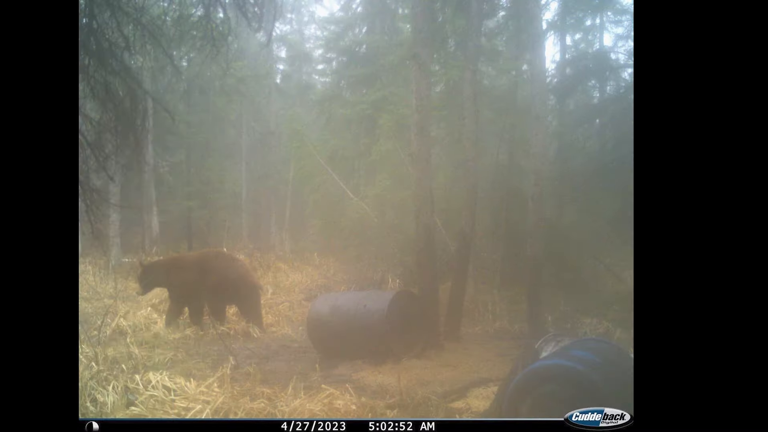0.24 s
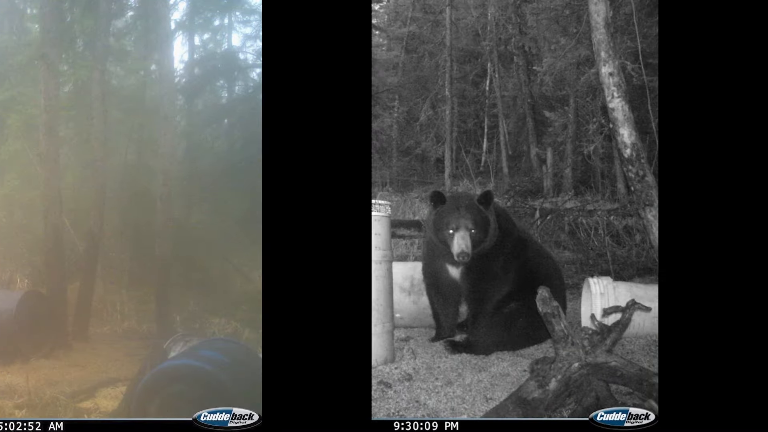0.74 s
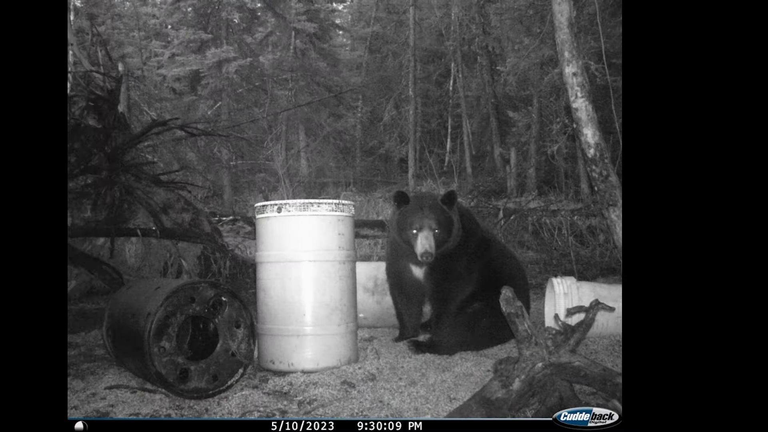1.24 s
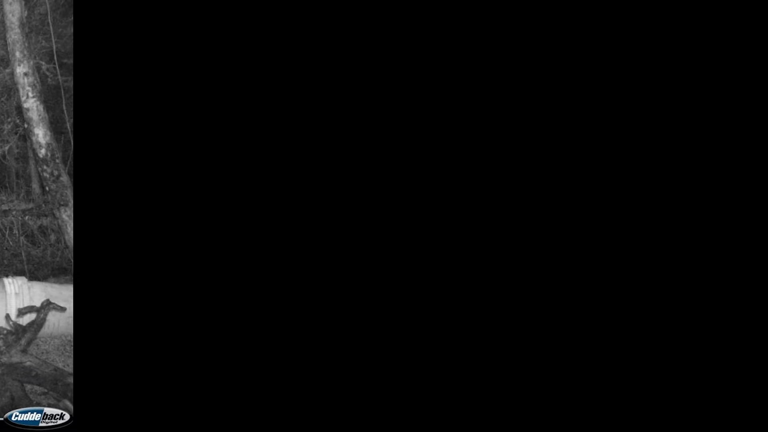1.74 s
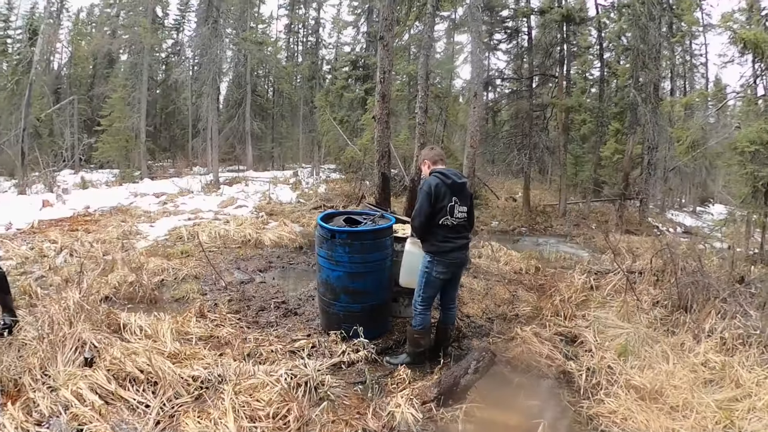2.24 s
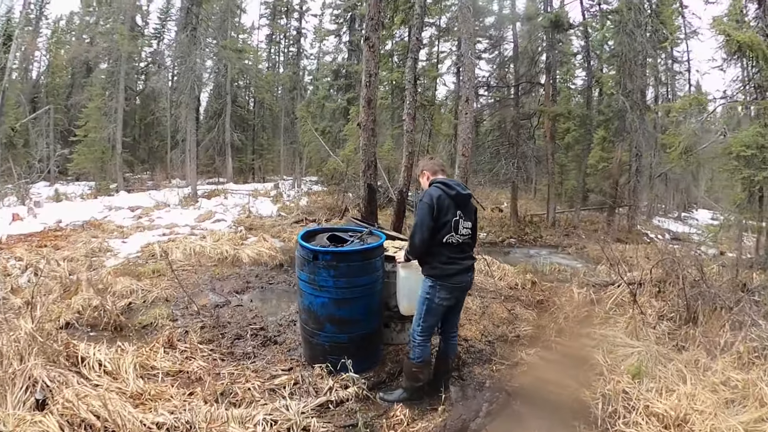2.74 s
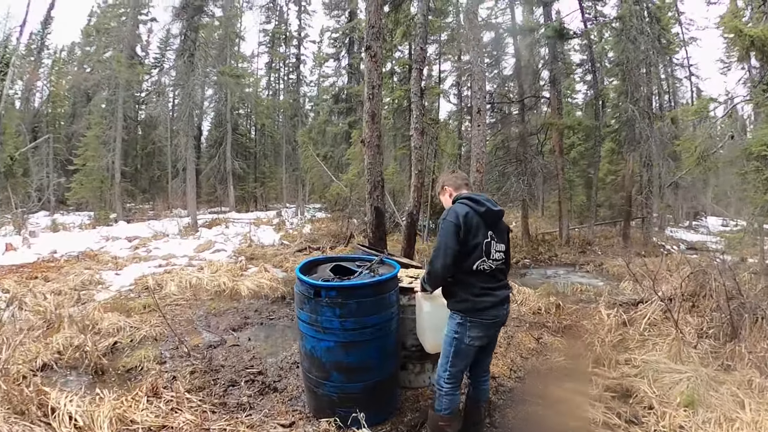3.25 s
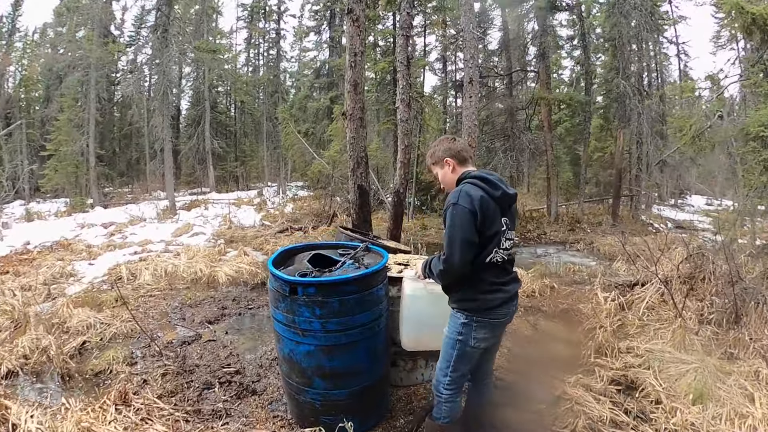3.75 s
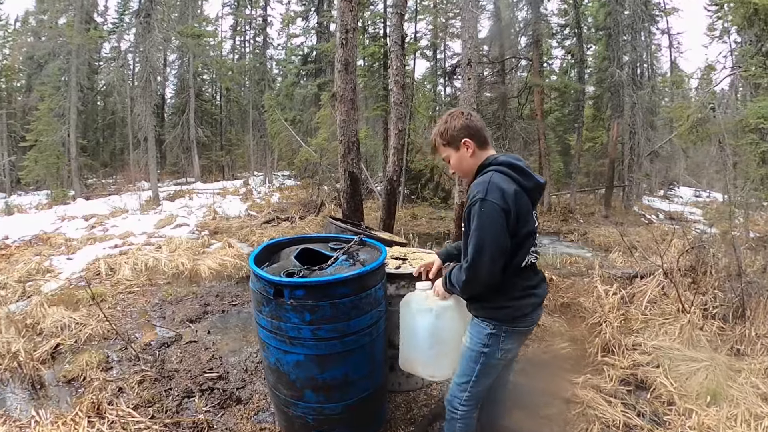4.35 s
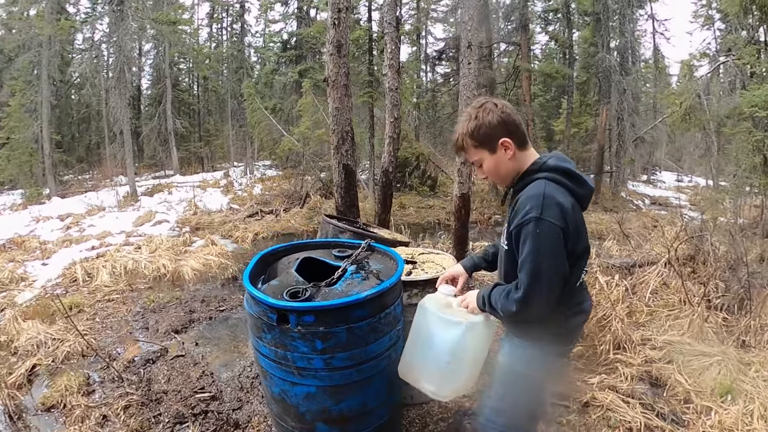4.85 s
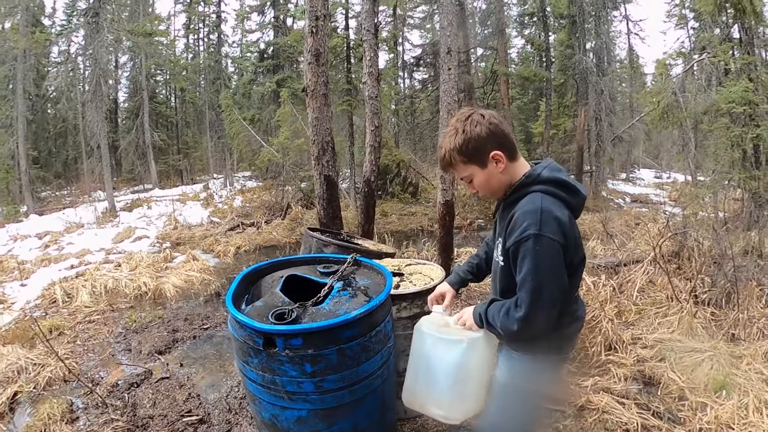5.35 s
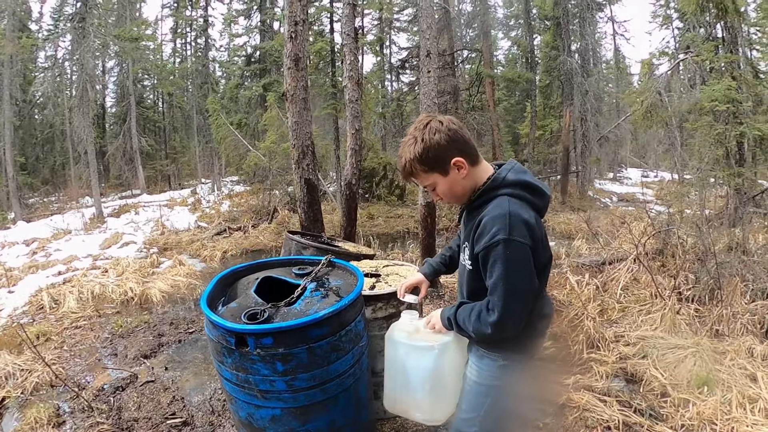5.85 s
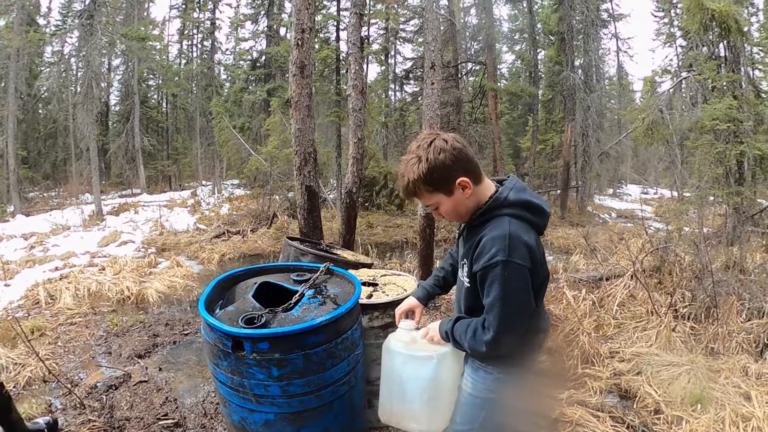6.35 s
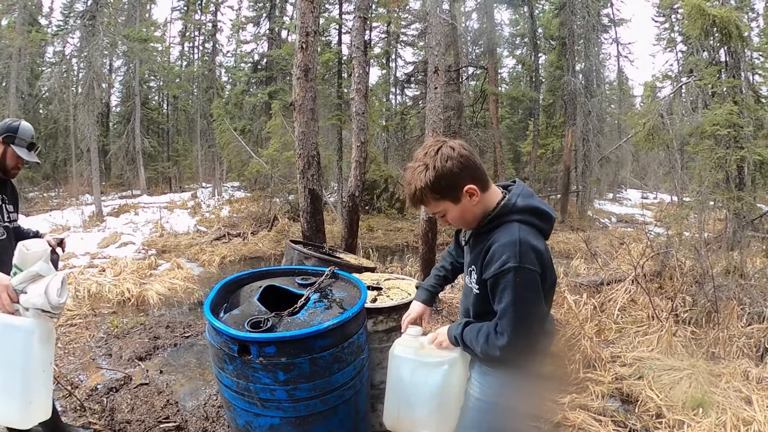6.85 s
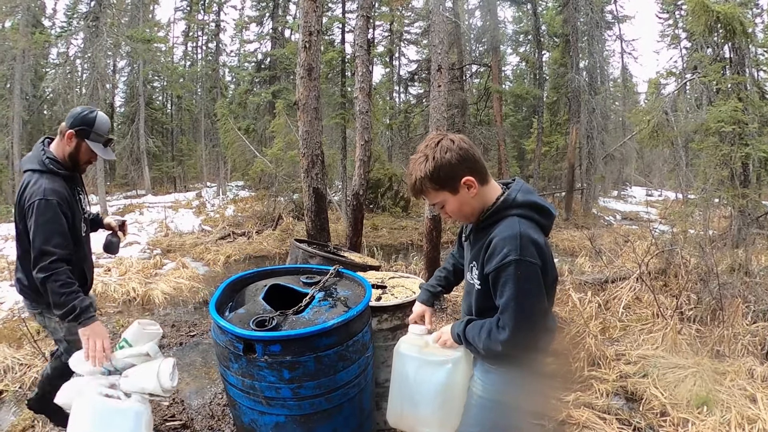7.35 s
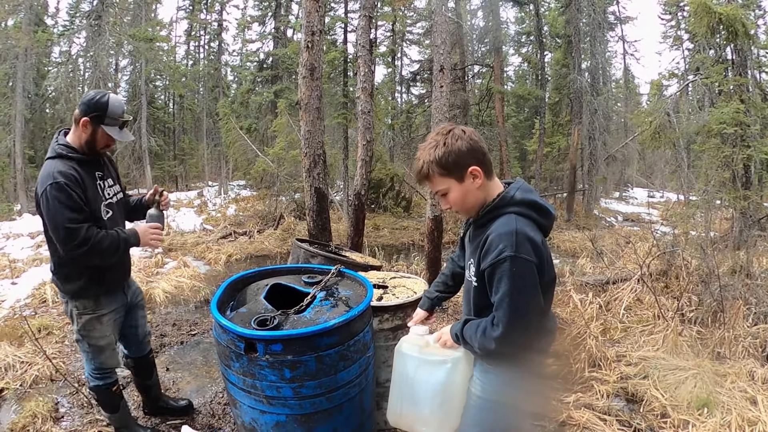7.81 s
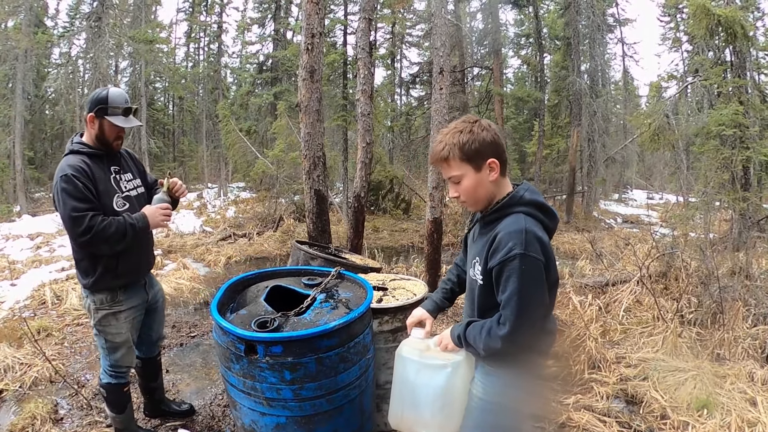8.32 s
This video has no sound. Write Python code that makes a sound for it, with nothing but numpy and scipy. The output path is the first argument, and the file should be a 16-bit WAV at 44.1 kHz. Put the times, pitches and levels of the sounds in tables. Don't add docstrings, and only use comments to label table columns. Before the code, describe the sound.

Over a faint low wind, two sharp clicks snap in near quiet. Boots brush through dry grass and suck out of wet mud with popping bubbles, squelches and twig snaps. Then a full plastic jug thuds, sloshes and glugs between rustling drags, ending in a cluster of heavy hollow knocks and a soft fade. Close stereo microphone outdoors, dry, with no echo.

```python
import sys
import numpy as np
from scipy import signal
from scipy.io import wavfile
from scipy.ndimage import uniform_filter1d

SR = 44100
rng = np.random.default_rng(int(sys.argv[2]) if len(sys.argv) > 2 else 0)


def generate_wav(signal):
    frames = np.transpose(np.atleast_2d(signal))
    scaled = np.clip(frames, -1, 1) * 32767
    pcm = np.round(scaled).astype(np.int16)
    wavfile.write(sys.argv[1], SR, pcm)


def ratio_of_db(decibels):
    return 10 ** (np.asarray(decibels, float) / 20)


N = 378378

# (pitch [Hz], density [dB per Hz])
AIR_SPECTRUM = [(100, 5.5), (237, -4), (333, -3.5), (449, -13.5), (924, -20), (2060, -13), (2470, -24),
                (12000, -48)]
# (time [s], level [dB])
AIR_SWELL = [(0, 5.5), (.3, 8.5), (.5, 1), (1, 2.5), (1.5, 7.5), (8.58, 14)]
# (time [s], peak [dB])
BUMPS = [
    (0.191, -55.5),
    (1.67, -65),
    (2.27, -53),
    (4.9, -28),
    (8.31, -58),
]
# (time [s], peak [dB])
TICKS = [
    (0.209, -49.5),
    (0.344, -48),
    (0.3815, -9.5),
    (0.9922, -49),
    (1.3826, -9.5),
]
# (pitch [Hz], level [dB], t60 [s])
CAP_MODES = [(602, -18, 0.018), (1170, -16.5, 0.009), (3080, 0.5, 0.0043), (4470, 2, 0.0038),
             (6000, -0.5, 0.003), (7540, -2, 0.002), (10030, -6, 0.0011)]
# (time [s], peak [dB], pitch
# [Hz], t60 [s])
POPS = [(0.3825, -48, 577, 0.045), (0.406, -24, 1000, 0.011), (0.9933, -30, 970, 0.013),
        (1.3769, -31, 1000, 0.013), (2.526, -19, 520, 0.028), (2.601, -16.5, 1250, 0.052),
        (2.72, -9.5, 1720, 0.045), (2.637, -19, 563, 0.14), (2.688, -16, 620, 0.05),
        (2.722, -14, 320, 0.089), (2.792, -23.5, 1140, 0.025), (3.22, -21, 1700, 0.063),
        (3.277, -14, 1620, 0.025), (3.335, -15, 1480, 0.025), (3.357, -9.5, 1890, 0.066),
        (3.379, -10, 1630, 0.015), (3.384, -15, 1370, 0.043), (3.468, -18.5, 479, 0.076),
        (3.551, -12.5, 1990, 0.078), (3.649, -14, 377, 0.03), (4.401, -11, 1220, 0.044),
        (4.514, -18.5, 1520, 0.077),
        (5.548, -29, 850, 0.06), (5.652, -19, 1220, 0.03), (5.731, -25.5, 790, 0.069),
         (6.243, -18.5, 1900, 0.018), (6.347, -20, 1373, 0.14), (6.985, -21, 630, 0.034),
         (7.041, -13, 1700, 0.014), (7.124, -16.5, 2210, 0.02), (7.391, -20.5, 400, 0.036),
         (7.483, -23, 397, 0.045), (7.604, -25, 920, 0.14), (7.675, -13, 342, 0.05)]
# (time [s], peak [dB], pitch [Hz], t60 [s])
PLOPS = [
    (2.965, -27.5, 2210, 0.07),
    (3.953, -23, 1812, 0.096),
    (4.531, -27, 456, 0.053),
    (4.576, -29.5, 330, 0.025),
]
# (peak time [s], fine hiss [dB], coarse stalks [dB], swell [s], fade [s])
STROKES = [(.848, -66.5, -67, 0.03, 0.031), (1.12, -77.5, -71, 0.2, 0.39), (1.45, -68.5, -63, 0.42, 0.71),
           (1.67, -48.5, -57, 0.16, 0.39), (1.876, -41, -46, 0.31, 0.68), (2.174, -41.5, -48, 0.88, 0.22),
           (2.552, -32.5, -34, 0.32, 0.088), (2.6, -43.5, -41.5, .06, 0.58), (3.03, -44, -46.5, 0.066, .02),
           (3.05, -52.5, -56.5, 0.016, 0.94), (3.215, -39, -35.5, 0.0072, 0.42),
           (3.485, -45, -40, 0.14, 0.095), (3.555, -40, -39, 0.018, 0.068), (3.679, -45.5, -38, 0.1, 0.2),
           (3.85, -53.5, -47, 0.25, 1), (4.216, -43, -48, 0.0071, 0.062), (4.29, -34, -37, 0.12, 0.44),
           (4.479, -37, -35.5, 0.15, 0.14),
           (4.72, -58, -57, 0.65, 0.27), (4.88, -50.5, -44.5, 0.054, 0.18), (5.0, -43.5, -38.5, 0.043, 0.41),
         (5.172, -38.5, -36, 0.27, 0.5), (5.362, -39, -34.5, 0.11, 0.34), (5.754, -43.5, -39, 0.95, 0.91),
         (6.1, -49.5, -44.5, 0.12, 1), (6.355, -44, -33.5, 0.024, 0.21), (6.68, -35, -32.5, 0.57, 0.21),
         (6.8, -44.5, -43, 0.12, 0.62), (7.165, -51, -40, 0.28, 0.21), (7.45, -53, -43, 0.39, 0.15),
         (7.633, -32, -33.5, 0.045, 0.036), (7.76, -53.5, -50, 0.31, 0.04),
         (7.798, -45.5, -38.5, 0.027, 0.2), (8.03, -56.5, -50, 0.15, 0.29), (8.43, -67, -57.5, 0.34, 0.23)]
# (pitch [Hz], density [dB per Hz])
HISS_SPECTRUM = [(2650, -34), (4500, -3), (5480, -5), (6150, 17.5), (7770, 16.5), (10900, 3), (12900, -7.5),
                 (15000, -44)]
# (time [s], left over right [dB])
SIDE_DB = [(1.5, -4), (1.68, 5.5), (3.43, 2), (3.84, 0), (4.2, 6), (8.18, 7.5), (8.58, 2)]
# (time [s], wash [dB])
WASH = [(1.55, 10), (1.9, 9), (2.3, 2), (2.4, -8), (4.7, -7), (5.0, 1), (6.9, 12), (7.0, -1), (8.1, -1)]
# (peak time [s], small bubbles [dB], big bubbles
# [dB], swell [s], fade [s])
SLOSHES = [(1.834, -47.5, -54, 0.22, 0.5), (2.142, -48.5, -60, 0.28, 0.34), (2.4, -42, -40, 0.091, 0.08),
           (2.5, -32, -39.5, 0.12, 0.52), (2.65, -30, -37, 0.19, 0.27), (2.803, -46, -49.5, 0.074, 0.58),
           (3.15, -44, -39.5, 0.02, 0.048), (3.266, -31, -39, 0.074, 0.43), (3.436, -37, -36.5, 0.36, 0.56),
           (3.96, -41.5, -48, 0.69, 0.28), (4.36, -40.5, -46.5, 0.32, 0.062),
           (4.412, -21, -33.5, 0.019, 0.032), (4.526, -41, -47, 0.55, 0.21),
           (4.838, -42, -34.5, 0.0046, 0.085), (4.9, -45.5, -46, 0.065, 0.33),
          (5.035, -39.5, -44, 0.046, 0.39), (5.343, -39, -55, 0.11, 0.7), (5.73, -42, -41.5, 0.3, 0.19),
          (5.98, -50, -55, 0.27, 1), (6.159, -38, -34, 0.004, 0.075), (6.397, -34, -43.5, 0.13, 0.11),
          (6.67, -33.5, -39.5, 0.54, 0.13), (6.8, -49.5, -63, 0.085, 0.55),
          (6.983, -37.5, -34, 0.0033, 0.061), (7.041, -37.5, -31.5, 0.0042, 0.18),
          (7.127, -37, -42, .004, 0.39), (7.392, -37.5, -35, 0.006, 0.13), (7.484, -34, -28, 0.0094, 0.071),
          (7.641, -36, -26, 0.038, 0.078), (7.675, -39.5, -25.5, 0.029, 0.15),
          (7.8, -38, -35.5, 0.025, 0.14), (7.97, -50.5, -70, 0.87, 0.45)]
# (peak time [s], level [dB], swell [s], fade [s])
LOADS = [(2.412, -40, 0.29, 0.28), (2.562, -18, 0.071, 0.017), (2.722, -27.5, 0.26, 0.11),
         (3.0, -48, 0.17, 0.4), (3.192, -29, 0.081, 0.87), (3.713, -27, 0.068, 0.0088),
         (4.079, -35, 0.097, 0.22), (4.317, -38.5, 0.12, 0.35), (4.84, -18, 0.0042, 0.031),
         (4.875, -21, 0.035, 0.2), (5.137, -30, 0.63, 0.075), (5.3, -40.5, 0.094, 0.23),
         (5.42, -27.5, 0.017, 0.16), (5.54, -28.5, 0.054, 0.32), (5.746, -24, 0.12, 0.13),
         (5.84, -40.5, .05, .12), (6.165, -30, 0.008, 0.45), (6.69, -31, 0.4, .06),
         (6.985, -26, 0.0077, 0.47), (7.045, -31, 0.011, 1), (7.396, -23, 0.0039, 0.19),
         (7.49, -19.5, 0.012, .11), (7.645, -15, 0.046, 0.42), (7.74, -12.5, 0.19, 0.16),
         (7.85, -11, 0.049, 0.024), (7.89, -28.5, 0.02, 0.18), (8.294, -44, 0.14, 0.17)]
# (pitch [Hz], width [Hz], level [dB])
JUG_MODES = [(140, 30, -5), (198, 16, 3), (260, 32, 0), (330, 80, -10)]
# (time [s], peak [dB], centre [Hz])
SNAPS = [(2.3257, -31, 7740), (2.4695, -24, 8600), (3.144, -40.5, 7840), (3.2091, -22, 7550),
         (3.251, -20, 8040), (3.3023, -19.5, 6000), (3.355, -22.5, 6600), (3.365, -24.5, 4540),
         (3.4761, -28.5, 5900), (3.662, -29, 2900), (5.6538, -23.5, 3200), (5.7318, -24, 2350),
         (6.0017, -33, 3950), (6.3485, -33, 3860), (7.1245, -28.5, 2470), (7.605, -34, 7560),
         (7.632, -26.5, 3320), (7.796, -25, 2460), (8.153, -38.5, 3150), (8.2, -36.5, 7150)]
# (time [s], peak [dB], centre [Hz])
STALKS = [(3.8144, -37, 3100), (3.899, -31.5, 5350), (4.0886, -32, 6680), (4.1674, -31, 4900),
          (4.2163, -33.5, 3500), (4.262, -32, 7200), (4.5415, -22.5, 5900), (4.603, -31, 7500),
          (4.7294, -43, 7830), (4.8354, -31, 3700), (4.857, -30, 4010), (4.913, -41, 3610),
          (4.9457, -40, 3680), (4.994, -29, 6070), (5.328, -24, 6310), (5.3577, -21, 6210),
          (5.913, -22, 6000), (5.9728, -36, 4320), (6.4911, -29, 4030), (7.0397, -41, 3520),
          (7.15, -27, 4530), (7.2529, -35, 4200), (7.307, -39, 3120), (7.398, -23, 3770),
          (7.4814, -24.5, 3040), (7.495, -28, 3420), (7.8542, -24, 3200), (7.9332, -32, 4110),
          (8.077, -39, 3500), (8.108, -34, 3100)]
# (time [s], peak [dB], centre [Hz], length
# [s])
SQUELCHES = [(2.349, -29.5, 2070, 0.012), (2.369, -23, 1450, 0.005), (2.397, -19.5, 1300, 0.011),
             (2.423, -22, 2220, 0.01), (2.466, -15.5, 1910, 0.018), (2.478, -19, 2940, 0.012),
             (2.503, -26, 1170, 0.005), (2.552, -12, 2990, 0.01), (2.616, -17, 1740, 0.027),
             (2.663, -12, 543, 0.0093), (2.733, -18, 1380, 0.016), (2.748, -20.5, 2100, 0.012),
             (2.808, -29, 650, 0.006), (2.831, -25.5, 730, 0.01), (2.869, -30, 1330, 0.012),
             (2.951, -32, 1680, 0.017), (3.144, -33, 1150, 0.013), (3.258, -16, 1700, 0.018),
             (3.3, -14, 1900, 0.006), (3.307, -16, 2700, 0.017), (3.401, -18, 1900, 0.012),
             (3.425, -19, 905, 0.017), (3.438, -14, 1830, 0.024), (3.472, -14.5, 1070, 0.022),
             (3.529, -16, 1290, 0.023), (3.596, -26, 1000, 0.008), (3.623, -30, 1200, 0.011),
             (3.658, -19.5, 1000, 0.015), (3.692, -20.5, 1180, 0.033), (3.75, -23.5, 1140, 0.0088),
             (3.776, -20.5, 520, 0.0078), (3.815, -30.5, 1790, 0.0092), (3.868, -32, 1520, 0.012),
             (3.895, -22.5, 1030, 0.0093), (3.947, -24.5, 627, 0.013), (3.968, -26.5, 1180, 0.0072),
             (4.279, -29, 2150, 0.01), (4.309, -27, 1390, 0.017), (4.374, -25, 2330, 0.019),
             (4.412, -10.5, 1500, 0.011), (4.629, -31.5, 2040, 0.02),
             (4.794, -29.5, 1530, 0.013), (4.821, -26.5, 1450, 0.006), (4.837, -19.5, 810, 0.0083),
            (4.85, -26, 950, 0.0095), (4.961, -31, 1120, 0.013), (5.021, -38, 2800, 0.01),
            (5.328, -30, 2700, 0.0099), (5.54, -24, 1560, 0.013), (5.607, -26.5, 1170, 0.012),
            (5.656, -22, 1400, 0.0093), (5.702, -34, 1890, 0.012), (5.913, -27.5, 1830, 0.0081),
            (5.975, -39, 2090, 0.0099), (5.99, -27, 2120, 0.01), (6.072, -34, 910, 0.008),
            (6.16, -26, 1110, 0.01), (6.366, -18, 1380, 0.015), (6.595, -29, 1050, 0.012),
            (6.627, -20, 1450, 0.012), (6.663, -19, 1680, 0.012), (7.044, -12.5, 1380, 0.01),
            (7.103, -30, 1190, 0.013), (7.125, -20, 1390, 0.0079), (7.14, -28, 1330, 0.011),
            (7.225, -20, 1270, 0.012), (7.237, -21, 1380, 0.0074), (7.293, -19, 1880, 0.012),
            (7.303, -23, 2210, 0.012), (7.393, -24, 970, 0.0099), (7.486, -14, 783, 0.0099),
            (7.614, -18.5, 1490, 0.021), (7.634, -17, 1690, 0.0092), (7.658, -19.5, 1010, 0.02),
            (7.804, -15.5, 2370, 0.0079), (7.887, -26, 1600, 0.0056), (7.903, -31, 1340, 0.011),
            (7.995, -41, 1350, 0.012), (8.019, -34, 1320, 0.01), (8.098, -45, 2870, 0.012),
            (8.185, -39, 1540, 0.012)]
# (time [s], peak [dB], pitch [Hz])
KNOCKS = [(2.53, -17, 195), (2.718, -19, 253), (3.647, -18, 347), (3.695, -17, 240), (2.556, -28, 214),
          (3.252, -25.5, 400), (3.367, -19.5, 299), (3.441, -22.5, 318), (4.838, -18.5, 185),
          (4.861, -11, 263), (4.866, -12.5, 139), (4.926, -21, 190), (5.422, -34, 205), (5.53, -23, 261),
          (5.703, -27, 167), (6.622, -21, 254), (6.652, -18, 250), (6.682, -19, 255), (6.988, -21, 176),
          (7.042, -16.5, 301), (7.052, -22.5, 423), (7.134, -24.5, 371), (7.185, -25.5, 358),
          (7.415, -19, 280), (7.483, -18, 165), (7.642, -6.5, 264), (7.727, -12.5, 194), (7.742, -15, 209),
          (7.783, -13, 286), (7.849, -18, 200)]
# (pitch [Hz], left-right correlation [-1..1])
LIKENESS = [(300, 0.19), (700, 0.93), (1200, 0.86), (2000, 0.59), (4000, 0.64), (8000, 0.77), (12000, 0.7)]

AIR_DB, STALK_DB = -64, -8
BUMP_SWELL_S, BUMP_FADE_S = 0.032, 0.14
GROUND_DB = -24
LINGER_DB, LINGER_S = -24, 0.13
SNAP_T60_S = 0.051
BUBBLE_SPREAD_DB = 3
RISE_HZ_PER_S = 4970
SPLASH_SHARE = 1.2
SQUELCH_EDGE_S = 0.0015
SQUELCH_WIDTH = 0.13
PORT_HZ = 1110
MIC_TOP_HZ = 17300


def rms_one(x):
    return x / np.sqrt(np.mean(x ** 2) + 1e-20)


def peak_one(x):
    return x / np.abs(x).max()


def in_time(rows):
    s, *columns = np.transpose(rows)
    return [np.interp(np.arange(N) / SR, s, c) for c in columns]


def at_hz(points, hz):
    table_hz, values = np.array(points).T
    return np.interp(np.log(hz), np.log(table_hz), values)


def drift(rate_hz):
    r = np.exp(-80 * np.pi * rate_hz / SR)
    noise = rng.standard_normal(N // 40 + 2002)
    slow = signal.lfilter([1], [1, -2 * r, r * r], noise)[2000:]
    return np.interp(np.arange(N) / 40, np.arange(len(slow)), rms_one(slow))


def band(x, low_hz, high_hz, order=2):
    return signal.sosfilt(signal.butter(order, [low_hz, high_hz], "band", fs=SR, output="sos"), x)


def ring(x, hz, width_hz):
    r = np.exp(-np.pi * width_hz / SR)
    poles = [1, -2 * r * np.cos(2 * np.pi * hz / SR), r * r]
    return signal.lfilter([(1 - r * r) / 2, 0, (r * r - 1) / 2], poles, x)


def add(out, s, sound):
    i = round(s * SR)
    out[..., i:i + sound.shape[-1]] += sound[..., :N - i]


def swells(rows, bend, rest_db):
    t, power = np.arange(0, N, 32) / SR, ratio_of_db(2 * rest_db)
    for s, *db, swell_s, fade_s in rows:
        rise = 1 + (t - s) / max(swell_s, 0.002)
        fall = 1 - (t - s) / max(fade_s, 0.005)
        near = np.clip(np.where(t < s, rise, fall), 0, 1)
        linger = (t > s) * ratio_of_db(2 * LINGER_DB) * np.exp(-2 * np.abs(t - s) / LINGER_S)
        power = power + ratio_of_db(2 * np.array(db))[:, None] * (near ** (2 * bend) + linger)
    return [np.interp(np.arange(N) / SR, t, 10 * np.log10(p)) for p in power]


def grains(per_s, spread_db, bed_db):
    bed = rng.standard_normal((2, N))
    sizes = ratio_of_db(spread_db * np.minimum(rng.exponential(1, (2, N)), 4)) * np.sign(bed)
    clicks = rms_one(sizes * (rng.random((2, N)) < per_s / SR))
    return (clicks + ratio_of_db(bed_db) * bed) / np.sqrt(1 + ratio_of_db(2 * bed_db))


def spread(pair, hz, pan_db=0):
    alike = np.clip(at_hz(LIKENESS, hz), -1, 1)
    shared = np.sqrt(1 + alike) * pair[0]
    opposed = np.sqrt(1 - alike) * pair[1] * [[1], [-1]]
    return (shared + opposed) * ratio_of_db(pan_db * np.array([[0.5], [-0.5]]))


def coloured(source, spectrum, low_hz, high_hz, count, patchy_db, pan_db=0):
    out, edges = 0, np.geomspace(low_hz, high_hz, count + 1)
    for k, (low, high) in enumerate(zip(edges, edges[1:])):
        hz = np.sqrt(low * high)
        gain = ratio_of_db(at_hz(spectrum, hz) + patchy_db * drift(22.6))
        part = spread(band(source[k % len(source)], low, high), hz)
        out = out + (-1) ** k * gain * part
    return rms_one(out) * ratio_of_db(np.array([[0.5], [-0.5]]) * pan_db)


def air():
    noise = coloured(rng.standard_normal((2, 2, N)), AIR_SPECTRUM, 150.7, 7600, count=9, patchy_db=1.5)
    return ratio_of_db(AIR_DB + in_time(AIR_SWELL)[0]) * noise


def rumble():
    bump, puff = band(rng.standard_normal((2, N)), 79.0, 114.0, order=3)
    bump_rows = [(s, db, BUMP_SWELL_S, BUMP_FADE_S) for s, db in BUMPS]
    hand_db, = swells(bump_rows, bend=2.1, rest_db=-115)
    load_db, = swells(LOADS, bend=1.8, rest_db=-64)
    level = ratio_of_db(hand_db) + ratio_of_db(1.27 * load_db + GROUND_DB)
    return level * rms_one(bump + puff * [[1], [-1]])


def ticks():
    out, t = np.zeros(N), np.arange(600) / SR
    strengths_db = rng.normal(0, 0.5, (len(TICKS), len(CAP_MODES)))
    for (s, db), own_db in zip(TICKS, strengths_db):
        sound = 0
        for k, ((hz, mode_db, t60_s), extra_db) in enumerate(zip(CAP_MODES, own_db)):
            decay = ratio_of_db(mode_db + extra_db - 60 * t / t60_s)
            sound = sound + decay * np.sin(2 * np.pi * hz * t) * (-1) ** k
        add(out, s, ratio_of_db(db + 4.5) * peak_one(sound))
    return out


def pops():
    out, t, rows = np.zeros((2, N)), np.arange(3000) / SR, POPS + PLOPS
    for (s, db, hz, t60_s), wet in zip(rows, rng.standard_normal((len(rows), 2, 3000))):
        fade = ratio_of_db(-60 * t / np.clip(t60_s, 0.004, 0.12)) * (1 - np.exp(-t * hz * 6))
        tone = np.sin(2 * np.pi * (0.95 * hz + RISE_HZ_PER_S * np.minimum(t, 0.03)) * t)
        wet = wet + 10.3 * (t * SR == 10) * [[1], [0]]
        splash = spread(band(wet, hz * 0.48, hz * 1.63), hz, 1.14 * hz / 1000)
        sound = fade * (tone + SPLASH_SHARE * splash)
        add(out, s, ratio_of_db(db + 2.0) * peak_one(sound))
    return out


def grass():
    hiss_db, stalk_db = swells(STROKES, bend=1.624, rest_db=-91.0)
    pan_db, = in_time(SIDE_DB)
    wash_db, = in_time(WASH)
    clump = ratio_of_db(1.62 * drift(19))
    blades = [clump * grains(2500, 8.4, 5.5)]
    fine = coloured(blades, HISS_SPECTRUM, 4660, 17700, count=6, patchy_db=1.5, pan_db=0.32 * pan_db)
    fine = fine + ratio_of_db(0.58 * wash_db - 10.0) * band(fine, 10800, 22000)
    whisper = np.clip((-59 - hiss_db) / 8, 0, 1.5)
    fine = fine + whisper * ring(fine, 7700, 705)
    tilt = [(2300, 10.4), (5600, 7.0)]  # (Hz, dB)
    stalks = [clump * grains(1300, 1.5, 0.0)]
    thick = coloured(stalks, tilt, 1870, 6660, count=3, patchy_db=-1.0, pan_db=pan_db)
    return ratio_of_db(hiss_db + 3.0) * fine + ratio_of_db(stalk_db + 1.4) * thick


def bubbles(per_s, low_hz, high_hz, cycles, bed_db, pan_db, tilt_db):
    clicks = grains(per_s * ratio_of_db(6.0 * drift(18)), BUBBLE_SPREAD_DB, bed_db)
    dealt, out = rng.integers(0, 10, N), 0
    for k, hz in enumerate(np.geomspace(low_hz, high_hz, 10)):
        rung = ring(ring(clicks * (dealt == k), hz, hz / cycles), hz, hz / 2)
        out = out + spread(rung, hz, pan_db) * ratio_of_db(tilt_db * np.log2(hz / low_hz))
    return rms_one(out)


def slosh():
    small_db, big_db = swells(SLOSHES, bend=1.49, rest_db=-76.5)
    wash_db, = in_time(WASH)
    small = bubbles(380, 1126, 2700, cycles=8, bed_db=wash_db, pan_db=4.0, tilt_db=-8.0)
    big = bubbles(140, 383.5, 1046, cycles=8, bed_db=wash_db + 5.5, pan_db=0.0, tilt_db=-5.5)
    return ratio_of_db(small_db + 2.0) * small + ratio_of_db(big_db + 2.2) * big


def hollow(x):
    return sum(ratio_of_db(db) * ring(x, hz, width_hz) * (-1) ** k
               for k, (hz, width_hz, db) in enumerate(JUG_MODES))


def thump():
    lumps = band(hollow(grains(65, 3.2, -6.0)[0]), 132, 630, order=3)
    power = uniform_filter1d(lumps ** 2, size=1800) + 0.13 * np.mean(lumps ** 2)
    load_db, = swells(LOADS, bend=2.3, rest_db=-79)
    return ratio_of_db(load_db - 2.5) * rms_one(lumps / power ** 0.28)


def snaps():
    out, t = np.zeros((2, N)), np.arange(2000) / SR
    rows = SNAPS + [(s, db + STALK_DB, hz) for s, db, hz in STALKS]
    for (s, db, hz), spray in zip(rows, rng.standard_normal((len(rows), 2, 2000))):
        burst = spray * ratio_of_db(-60 * t / SNAP_T60_S)
        burst[0, 0] += 5.0
        pan_db = np.interp(s, *np.transpose(SIDE_DB))
        sound = spread(band(ring(burst, hz, hz * 0.31), 860, 11500), hz, pan_db)
        add(out, s, ratio_of_db(db + 9.5) * peak_one(sound))
    return out


def squelches():
    out, t, rows = np.zeros((2, N)), np.arange(2600) / SR, SQUELCHES
    for (s, db, hz, hold_s), wet in zip(rows, rng.standard_normal((len(rows), 2, 2600))):
        die = np.exp(-np.maximum(t - np.clip(hold_s, 0.002, 0.04), 0) / 0.011)
        shape = np.clip(t / SQUELCH_EDGE_S, 0, 1) * die
        rung = ring(ring(wet, hz, hz * SQUELCH_WIDTH), hz, hz * 1.6)
        power = uniform_filter1d(rung ** 2, size=round(3 * SR / hz)) + 1e-9
        rung = rung / power ** 0.47
        sound = shape * spread(rung * [[1], [0.35]], hz, 1.6 * hz / 1000)
        add(out, s - 0.001, ratio_of_db(db - 4.0) * peak_one(sound))
    return out


def knocks():
    out, t = np.zeros(N), np.arange(5000) / SR
    shape = ratio_of_db(-60 * t / 0.069) * (1 - np.exp(-t / 0.0018))
    for s, db, hz in KNOCKS:
        sound = np.sin(2 * np.pi * hz * (t - 0.5 * t * t)) * shape
        add(out, s, ratio_of_db(db - 2.0) * peak_one(sound))
    return out


def scene():
    high_pass = signal.butter(4, 105, "high", fs=SR, output="sos")
    blows = signal.sosfilt(high_pass, thump() + pops() + knocks() + ticks())
    return grass() + slosh() + blows + squelches() + snaps() + rumble() + air()


def top_cut(x):
    return signal.sosfilt(signal.butter(12, 16800, fs=SR, output="sos"), x)


def record(dry):
    mid, side = (dry[0] + dry[1]) / 2, (dry[0] - dry[1]) / 2
    side = side + 0.26 * np.gradient(mid)
    low_pass = signal.butter(3, PORT_HZ, fs=SR, output="sos")
    side = side - 0.87 * signal.sosfiltfilt(low_pass, side)
    x = np.array([mid + side, mid - side]) - 0.025 * mid * [[1], [-1]]
    limited = 0.5 * np.tanh(x / 0.5)
    mix = signal.sosfilt(signal.cheby2(8, 50, MIC_TOP_HZ, fs=SR, output="sos"), limited)
    return top_cut(mix)


dry = scene()
out = record(dry)
generate_wav(out)
```